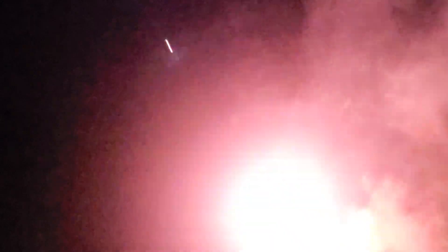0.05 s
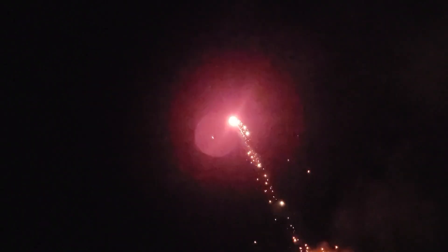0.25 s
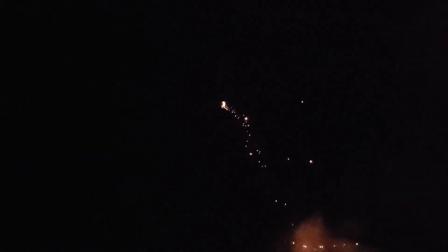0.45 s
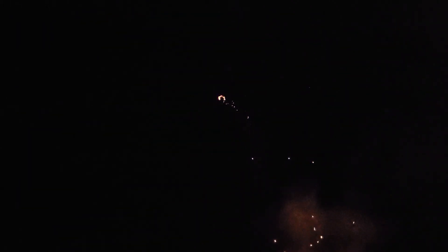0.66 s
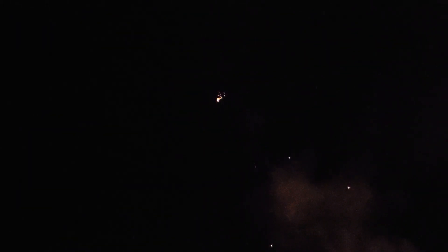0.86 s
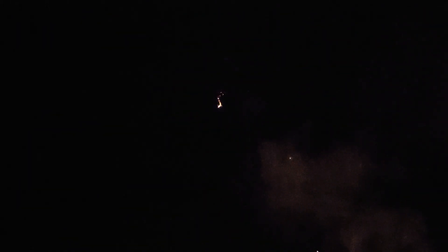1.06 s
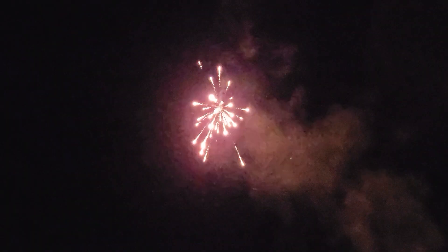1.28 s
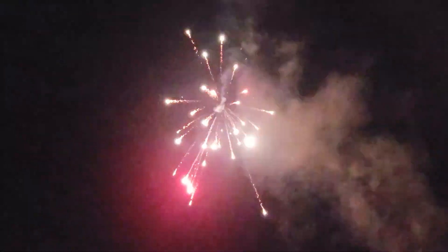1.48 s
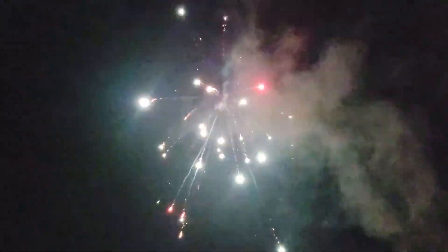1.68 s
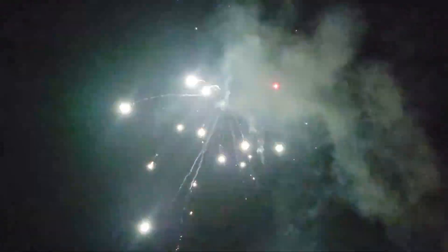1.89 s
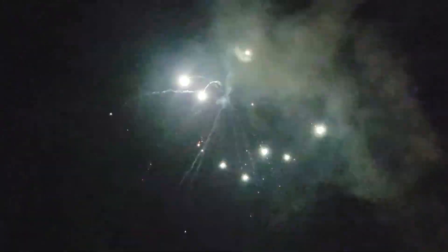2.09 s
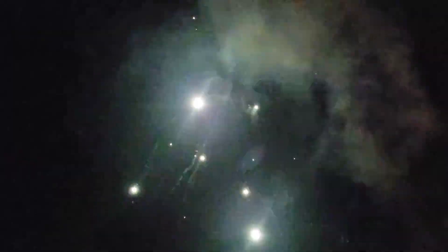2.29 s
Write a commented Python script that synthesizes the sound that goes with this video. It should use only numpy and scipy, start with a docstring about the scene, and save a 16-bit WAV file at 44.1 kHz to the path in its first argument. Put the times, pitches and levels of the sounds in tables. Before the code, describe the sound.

Two sharp firework bangs just over a second apart outdoors, a hollow launch then a rolling burst

```python
"""A Roman candle outdoors at night: noise rushes from the tube and the shot leaves with a hollow bang.
About 1.2 s later the star bursts overhead: a sharp pressure jump, then noise rolling back as echoes.
Sparks tick, soft pops and late echoes are noise bursts; a faint whistle is noise in a narrow band.
A distant engine hums as two sine waves whose pitch sags, then climbs, over wash, rumble and hiss."""
import sys
import numpy as np
from scipy import signal
from scipy.fft import rfft, irfft
from scipy.io import wavfile

SR = 44100
rng = np.random.default_rng(int(sys.argv[2]) if len(sys.argv) > 2 else 0)


def persist_wave(psi):
    """Save psi, clipped to +-1, as 16-bit WAV."""
    counts = np.round(np.clip(psi, -1, 1) * 32767).astype(np.int16)
    wavfile.write(sys.argv[1], SR, np.atleast_2d(counts).T)


N = 103282  # length in samples
T = np.arange(N) / SR  # time in seconds

# Below, a fade time is the seconds a sound takes to drop by 60 dB.
# Width is bandwidth divided by centre frequency. Levels are those before later filters.
# A swell's rise is the seconds per 60 dB before its turning point; negative means it was louder before.

# Sharp pressure fronts of both bangs and their first reflections. Each row: start in seconds,
# level in dB, length of the push in ms, left minus right in dB, ringing in the housing in dB.
SHOCK_FRONTS = [(0.0854, 6, 0.25, 1, -12), (.0871, -3, 0.1, -10, -3), (.08925, 3, 0.3, 2, -12),
                (1.30540, 4.5, 0.35, -6, 2), (1.3067, -3.5, 0.4, 5, 2), (1.31150, 5, 0.3, 3, -1)]
SHOCK_LOW_HZ, SHOCK_HIGH_HZ = 126, 4500
# Slow push of pressure under each bang. Each row: start in seconds, level in dB,
# length of the push in ms, left minus right in dB.
WHUMPS = [(.083, -24, 3.5, 0), (1.3054, -22, 2.2, 12)]
WHUMP_TOP_HZ = 130
# Brief ringing of the microphone housing. Each row: frequency in Hz, width as a ratio, level in dB.
HOUSING_RINGS = [(764.5, 0.25, -9.5), (1243, 0.15, 2.5), (6850, 0.062, -6)]
# Close surfaces break up each front.
SCATTER_DB, SCATTER_FADE_S, SCATTER_TOP_HZ = -21, 0.01, 4450

# Starts of the hollow ringing; the last weak one is a reflection.
# Each row: start in seconds, level in dB.
TUBE_RING_STARTS = [(0.0543, -28), (0.0723, -16), (0.0838, -15), (.0878, -19), (.1135, -27)]
# Notes of the air in the tube. Each row: frequency in Hz, level in dB, fade time in seconds.
TUBE_MODES = [(250, 0, 0.03), (310, -8, .035), (490, -8, 0.035)]
TUBE_LOW_HZ = 130

# Gas leaving the tube. Each row: turning point in seconds, level in dB, rise in seconds,
# fade time in seconds.
MUZZLE_GAS = [(.056, -30, -5.77, 0.33), (.079, -16, .04, 0.045)]
# Tone colour of that gas. Each row: frequency in Hz, level in dB.
MUZZLE_COLOUR = [(60, -30.5), (140, -15), (250, 2), (600, -17), (1100, -6.5), (1900, -4), (3300, -10.5),
                 (5500, -23), (8000, -29.5), (11000, -25), (15000, -25)]
IGNITION_S, IGNITION_RISE_S = 0.051, 0.0087
JET_DULLING_PER_KHZ = 0.038  # a weaker jet is duller: extra share of its level drop
FUSE_DB, FUSE_FADE_S, FUSE_HZ, FUSE_WIDTH = -52, 0.6, 2140, 0.15
# Brief swell of noise before the overhead crack. Each row: turning point in seconds, level in dB,
# rise in seconds, fade time in seconds.
CRACK_SWELL = [(1.3015, -19, 0.034, 0.018)]
# Tone colour of that swell. Each row: frequency in Hz, level in dB.
CRACK_SWELL_COLOUR = [(150, -19), (600, -17.5), (1200, -8), (2100, -25), (3700, -23), (5500, -38),
                      (12000, -41)]

# Scattered sound of the launch coming back. Each row: turning point in seconds, level in dB,
# rise in seconds, fade time in seconds.
LAUNCH_ECHOES = [(.093, -28.5, -5.3, 0.23), (0.169, -44.5, -2, 1.33), (.262, -44, 0.25, 0.25)]
# Tone colour of the launch echoes. Each row: frequency in Hz, level in dB.
LAUNCH_ECHO_COLOUR = [(47, -36), (80, -11), (151, -9), (192, 1), (311, -5), (423, -20.5), (526, -16),
                      (640, -21), (890, -14.5), (2230, -11.5), (3310, -15.5), (5130, -26.5), (15000, -45)]
# Scattered sound of the burst coming back. Each row: turning point in seconds, level in dB,
# rise in seconds, fade time in seconds.
BURST_ECHOES = [(1.317, -26, 0.046, 0.2), (1.44, -32, 0.58, 0.58), (1.511, -37.5, 0.17, 0.642)]
# Tone colour of the burst echoes. Each row: frequency in Hz, level in dB.
BURST_ECHO_COLOUR = [(47, -50), (80, -20), (124, -5), (330, -1), (587, -5), (930, 2.5), (1790, -2.5),
                     (2230, -9), (2600, -4), (3610, -6.5), (15000, -31.5)]
LAUNCH_S, BURST_S = 0.081, 1.308  # no echo roll sounds before these times
LAUNCH_AIR_LOSS, BURST_AIR_LOSS = 4, 3.5  # treble lost in the air, dB per second per kHz
ECHO_GRAIN_DB, ECHO_PATCHY_DB = 1.5, 1.66
# Separate reflections of the bangs. Each row: start in seconds, level in dB, centre in Hz.
SLAPS = [(.1345, -41, 2000), (1.317, -27, 800), (1.33, -29, 800), (1.491, -31, 900)]
SLAP_FADE_S, SLAP_WIDTH = 0.045, 1.2

# Ticking sparks. Each row: start in seconds, level in dB, fade time in seconds, centre in Hz.
SPARKS = [(0.526, -65, 0.09, 4000), (.803, -61, .19, 790), (.815, -56, .053, 2370),
          (.823, -53.5, .06, 2900), (0.834, -62, 0.06, 3200), (.934, -65, 0.04, 7400),
          (1.0992, -48, 0.018, 3000), (1.253, -57, .09, 3200)]
SPARK_WIDTH, SPARK_GRAIN_DB, SPARK_TOP_HZ = 0.575, 4.5, 7000
# Dry snaps close by. Each row: start in seconds, level in dB.
SNAPS = [(2.1643, -46), (2.1754, -42.5)]
SNAP_HZ, SNAP_WIDTH, SNAP_FADE_S = 2750, 0.29, 0.023
# Faint whistle. Each row: turning point in seconds, level in dB, rise in seconds, fade time in seconds.
WHISTLE_SWELLS = [(.96, -71, .7, .9)]
WHISTLE_HZ, WHISTLE_WIDTH = 1880, 0.025
# Soft pops and late echoes of the burst. Each row: start in seconds, level in dB,
# fade time in seconds, centre in Hz.
SOFT_POPS = [(.995, -53, 0.24, 1065), (1.101, -57, 0.15, 1110), (1.739, -58, 0.6, 2880),
             (1.825, -51, 0.55, 683), (2.168, -52, .15, 990)]
POP_WIDTH = 0.75
# Low hollow tones, the first an echo of the tube's ring. Each row: turning point in seconds,
# level in dB, fade time in seconds, pitch in Hz.
HOLLOW_TONES = [(.26, -38, .11, 205), (1.103, -45, .08, 285)]
HOLLOW_RISE_S = 0.04

# Firing rate of the distant engine. Each row: time in seconds, rate in Hz.
ENGINE_HZ = [(0, 71.07), (.42, 69.06), (.75, 75.37), (1.6, 86.76), (2.0, 93.5), (2.34, 99)]
# Its two tones. Each row: time in seconds, level in dB at the firing rate, level in dB at twice that.
ENGINE_DB = [(0, -61, -59), (.33, -63, -72), (.45, -53, -64.5), (1.05, -57, -62), (1.7, -71, -60.5),
             (2.08, -66, -56), (2.17, -55, -53.5), (2.34, -51, -50)]
ENGINE_WAVER_DB = 1.5
# Level of the open-air wash. Each row: time in seconds, level in dB.
AIR_DB = [(0, -56), (.3, -60), (.7, -66), (1.2, -64.5), (1.7, -52), (2.08, -59), (2.2, -57), (2.34, -52)]
# Tone colour of the wash. Each row: frequency in Hz, level in dB.
AIR_COLOUR = [(200, -32), (330, -6), (1100, 2), (2100, -6), (2900, -3.5), (4200, -15.5), (5300, -23.5),
              (8700, -39), (15000, -42.5)]
# Tone colour of the low rumble. Each row: frequency in Hz, level in dB.
RUMBLE_COLOUR = [(25, -15), (65, -2.5), (157, -4), (258, -7), (450, -22.5), (580, -38), (990, -120)]
# Tone colour of the steady microphone hiss. Each row: frequency in Hz, level in dB.
HISS_COLOUR = [(300, -3), (2500, 4), (5000, -10), (7500, -2.5), (8600, -24), (15000, -15)]
RUMBLE_DB, HISS_DB = -59.5, -70.5

# How the two microphone ports differ. Each row: frequency in Hz, left minus right in dB.
PORT_BALANCE = [(150, -1), (700, -2), (2400, -9), (4400, -5), (8000, 4.5), (15000, 7.5)]
PORT_SPACING_S = 0.0005135  # sound's travel time between the two ports
CUTOFF_HZ = 16000


def shocks():
    """Sharp fronts ring in the housing, trailed by close scatter, over a low whump."""
    fronts, ringing, scatter = np.zeros((3, 2, N))
    for start, db, push_ms, pan_db, ring_db in SHOCK_FRONTS:
        strength = panned(pan_db) * from_db(db)
        front = strength * blast_wave(start, push_ms)
        fronts += front
        ringing += from_db(ring_db) * front
        scatter += strength * fading(start, SCATTER_FADE_S)
    scatter_noise = rms_one(butter(stereo_white(0.4), SCATTER_TOP_HZ, "low", order=1))
    cracks = fronts + from_db(SCATTER_DB) * scatter * scatter_noise
    cracks = butter(cracks, SHOCK_LOW_HZ, "high", order=1)
    cracks = butter(cracks, SHOCK_HIGH_HZ, "low", order=1)
    cracks = from_db(-3.0) * butter(cracks, 7000, "low", order=1)
    rings = sum(from_db(db) * band(ringing, hz, width, order=1) for hz, width, db in HOUSING_RINGS)
    whumps = sum(from_db(db) * panned(pan_db) * blast_wave(start, push_ms)
                 for start, db, push_ms, pan_db in WHUMPS)
    return cracks + rings + butter(whumps, WHUMP_TOP_HZ, "low")


def blast_wave(start, push_ms):
    """A jump in pressure that falls into a longer suction."""
    age = np.maximum(T - start, 0) * 1000 / push_ms  # in push lengths
    return (T >= start) * (1 - age) * np.exp(-np.minimum(age, 50))


def tube():
    """The air in the tube rings hollow from each start, as sine waves that fade."""
    ring = np.zeros(N)
    for start, start_db in TUBE_RING_STARTS:
        for hz, mode_db, fade_s in TUBE_MODES:
            note = fading(start, fade_s) * np.sin(2 * np.pi * hz * (T - start))
            ring += from_db(start_db + mode_db) * note
    return butter(ring, TUBE_LOW_HZ, "high") * panned(1.2)


def gas():
    """The fuse's hiss, and the rush of noise as gas leaves the muzzle."""
    fuse = puff(0, FUSE_DB, FUSE_FADE_S, FUSE_HZ, FUSE_WIDTH, alike=0.3)
    muzzle = coloured(MUZZLE_COLOUR, jet, diffuse=0.67, pan_db=2.5)
    return fuse + muzzle


def jet(hz):
    """The muzzle jet is brighter when it is stronger: the treble drops more than the bass."""
    flow = swells(MUZZLE_GAS)(hz)
    ignition = np.clip((T - IGNITION_S) / IGNITION_RISE_S, 0, 1)
    dulling = (flow / flow.max()) ** (JET_DULLING_PER_KHZ * hz / 1000)
    return ignition * flow * dulling


def crack_swell():
    """A brief swell of noise before the overhead crack."""
    return coloured(CRACK_SWELL_COLOUR, swells(CRACK_SWELL), diffuse=0.96, pan_db=1.5)


def echoes():
    """Ground, trees and houses scatter both bangs back as a grainy roll."""
    launch = coloured(LAUNCH_ECHO_COLOUR, swells(LAUNCH_ECHOES, LAUNCH_AIR_LOSS),
                      diffuse=1, pan_db=0.1, patchy_db=ECHO_PATCHY_DB)
    burst = coloured(BURST_ECHO_COLOUR, swells(BURST_ECHOES, BURST_AIR_LOSS),
                     diffuse=1, pan_db=0.1, patchy_db=ECHO_PATCHY_DB)
    roll = (T >= LAUNCH_S) * launch + (T >= BURST_S) * burst
    return roll * from_db(ECHO_GRAIN_DB * flicker(400))


def slaps():
    """Larger surfaces return the bangs as separate cracks."""
    return ports(sum(puff(start, db, SLAP_FADE_S, hz, SLAP_WIDTH, alike=0.3) for start, db, hz in SLAPS))


def sparks():
    """Sparks tick as short, grainy bursts of noise with softened treble."""
    ticks = sum(puff(start, db, fade_s, hz, SPARK_WIDTH, alike=0.3, order=1)
                for start, db, fade_s, hz in SPARKS)
    grainy = ticks * from_db(SPARK_GRAIN_DB * flicker(650))
    return ports(butter(grainy, SPARK_TOP_HZ, "low", order=1))


def snaps():
    """Dry snaps are noise bursts that fade very fast."""
    return ports(sum(puff(start, db, SNAP_FADE_S, SNAP_HZ, SNAP_WIDTH, alike=0.345) for start, db in SNAPS))


def whistle():
    """A faint airy whistle, noise in a narrow band, swells while the star climbs and then fades."""
    tone = rms_one(band(stereo_white(0.5), WHISTLE_HZ, WHISTLE_WIDTH))
    return tone * swells(WHISTLE_SWELLS)(WHISTLE_HZ)


def soft_pops():
    """Soft pops and late echoes of the burst: wide bands of noise that die away."""
    return ports(sum(puff(start, db, fade_s, hz, POP_WIDTH, alike=0.72)
                     for start, db, fade_s, hz in SOFT_POPS))


def hollow_tones():
    """Low hollow tones, sine waves that swell and fade; the first is an echo of the tube's ring."""
    tones = np.zeros(N)
    for turn_s, db, fade_s, hz in HOLLOW_TONES:
        level = swells([(turn_s, db, HOLLOW_RISE_S, fade_s)])(hz)
        tones += level * np.sin(2 * np.pi * hz * (T - turn_s))
    return tones


def engine():
    """A far exhaust hum, unsteady in pitch and level: the firing rate and its octave."""
    hz, = in_time(ENGINE_HZ)
    phase = 2 * np.pi * np.cumsum(hz * (1 + 0.008 * flicker(18))) / SR
    hum = np.zeros(N)
    for multiple, db in enumerate(in_time(ENGINE_DB), start=1):
        hum += from_db(db + ENGINE_WAVER_DB * flicker(14)) * np.sin(multiple * phase)
    return hum * panned(-1.1)


def night_air():
    """Far wash of sound, low rumble and steady hiss, all made from coloured noise."""
    level = from_db(in_time(AIR_DB)[0])
    wash = coloured(AIR_COLOUR, lambda hz: level, diffuse=1, pan_db=0.0, patchy_db=2.5)
    rumble = coloured(RUMBLE_COLOUR, lambda hz: from_db(RUMBLE_DB), diffuse=1, pan_db=1.3)
    hiss = coloured(HISS_COLOUR, lambda hz: from_db(HISS_DB), diffuse=0.92, pan_db=0)
    return wash + rumble + hiss


def coloured(spectrum, envelope, diffuse, pan_db, patchy_db=0):
    """Noise in narrow bands under envelope(Hz); diffuse sound differs between the spaced ports."""
    edges = np.geomspace(22, 17000, 33)
    centres = np.sqrt(edges[1:] * edges[:-1])
    gains = from_db(at_hz(spectrum, centres)) * np.sqrt(centres)  # higher bands are wider
    gains /= np.linalg.norm(gains)
    out = np.zeros((2, N))
    for low, high, hz, gain in zip(edges, edges[1:], centres, gains):
        # Low notes reach both ports almost alike, high notes do not.
        alike = 1 - diffuse * (1 - 1.023 * np.sinc(2 * hz * PORT_SPACING_S))
        noise = rms_one(butter(stereo_white(alike), [low, high], "band", order=3))
        patches = from_db(patchy_db * flicker(20)) if patchy_db else 1
        balance = panned(at_hz(PORT_BALANCE, hz) + pan_db)
        out += gain * envelope(hz) * patches * noise * balance
    return out


def swells(rows, air_loss=0):
    """Envelope of swells that turn and die away; with air_loss the treble fades sooner."""
    def envelope(hz):
        power = 0
        for turn_s, db, rise_s, fade_s in rows:
            before = 60 * np.maximum(turn_s - T, 0) / rise_s
            after = np.maximum(T - turn_s, 0) * (60 / fade_s + air_loss * hz / 1000)
            level_db = np.maximum(db - before - after, -200)
            power = power + np.exp(level_db * np.log(10) / 10)
        return np.sqrt(power)
    return envelope


def puff(start, db, fade_s, hz, width, alike, order=2):
    """A sudden burst of noise that dies away, heard through a resonance."""
    white = stereo_white(alike)
    burst = white * from_db(db) * fading(start, fade_s)
    steady_level = np.std(band(white, hz, width, order=order))
    return band(burst, hz, width, order=order) / steady_level


def fading(start, fade_s):
    """A sudden start at full level, then a steady fade in dB."""
    return (T >= start) * from_db(-np.minimum(60 * np.abs(T - start) / fade_s, 200))


def ports(x):
    """The two ports favour different parts of the spectrum."""
    hz = np.maximum(np.arange(N // 2 + 1) * SR / N, 1)
    return irfft(rfft(x) * panned(at_hz(PORT_BALANCE, hz)), N)


def panned(pan_db):
    """Left and right gains from left minus right in dB."""
    return from_db(np.array([[0.5], [-0.5]]) * pan_db)


def stereo_white(alike):
    """White noise, partly shared by both sides."""
    mid, side = rng.standard_normal((2, N))
    alike = np.clip(alike, -1, 1)
    return np.sqrt(1 + alike) * mid + np.sqrt(1 - alike) * side * np.array([[1], [-1]])


def flicker(rate_hz):
    """Random wander of unit spread, no faster than about rate_hz."""
    return rms_one(butter(rng.standard_normal(N), rate_hz, "low"))


def band(x, hz, width, order=2):
    """Keep a band of frequencies around hz; width is bandwidth over centre."""
    spread = width / 2 + np.sqrt(1 + width ** 2 / 4)
    return butter(x, [hz / spread, hz * spread], "band", order=order)


def butter(x, hz, kind, order=2):
    """Butterworth filter that works forwards in time."""
    sos = signal.butter(order, np.clip(hz, 10, 0.45 * SR), kind, fs=SR, output="sos")
    return signal.sosfilt(sos, x + 1e-18)


def at_hz(points, hz):
    """Read a spectrum on a log-frequency axis."""
    points = np.array(points)
    return np.interp(np.log(hz), np.log(points[:, 0]), points[:, 1])


def in_time(rows):
    """Columns of a curve, sample by sample."""
    seconds, *columns = np.transpose(rows)
    return [np.interp(T, seconds, column) for column in columns]


def from_db(db):
    """Decibels to gain."""
    return 10 ** (np.asarray(db) / 20)


def rms_one(x):
    """Scale to an average (rms) level of one."""
    return x / np.sqrt(np.mean(x ** 2) + 1e-20)


def scene():
    """Everything as it reaches the microphones."""
    candle = shocks() + tube() + gas() + crack_swell() + echoes() + slaps()
    small_sounds = sparks() + snaps() + whistle() + soft_pops() + hollow_tones()
    return candle + small_sounds + engine() + night_air()


def record(dry):
    """Peaks are rounded and the top is cut."""
    rounded = np.tanh(dry)
    top_cut = signal.ellip(10, 0.1, 80, CUTOFF_HZ, fs=SR, output="sos")
    return signal.sosfilt(top_cut, rounded)


dry = scene()
out = record(dry)
persist_wave(out)
```